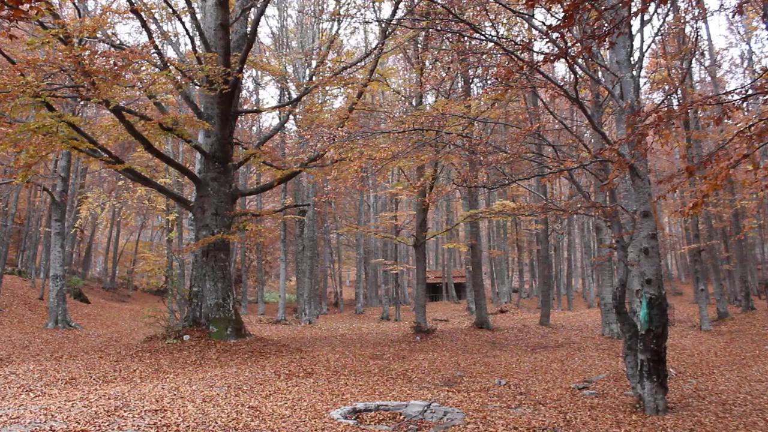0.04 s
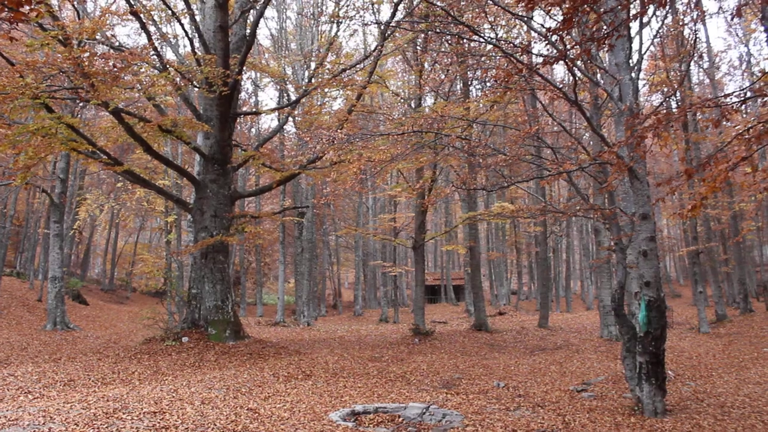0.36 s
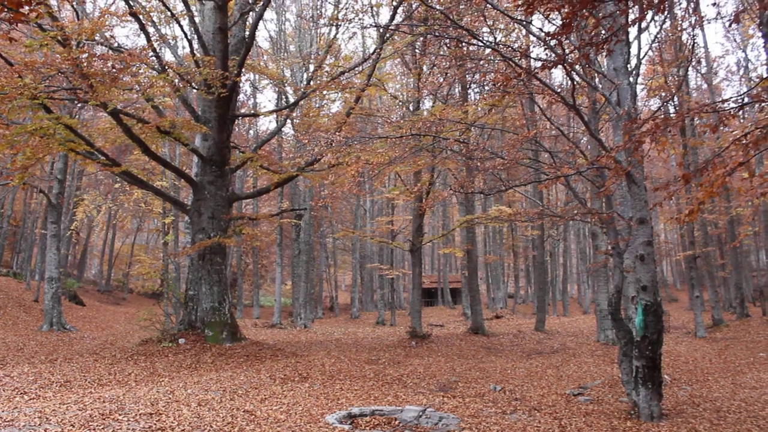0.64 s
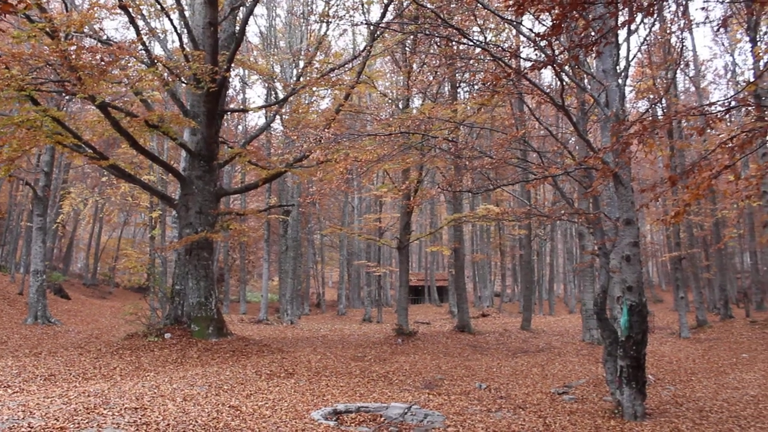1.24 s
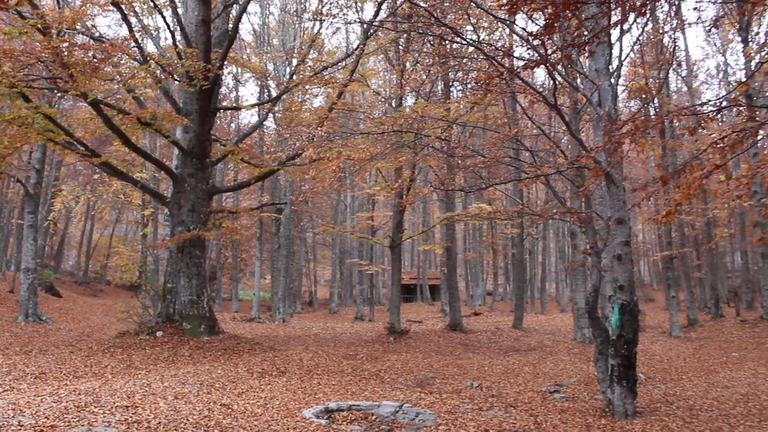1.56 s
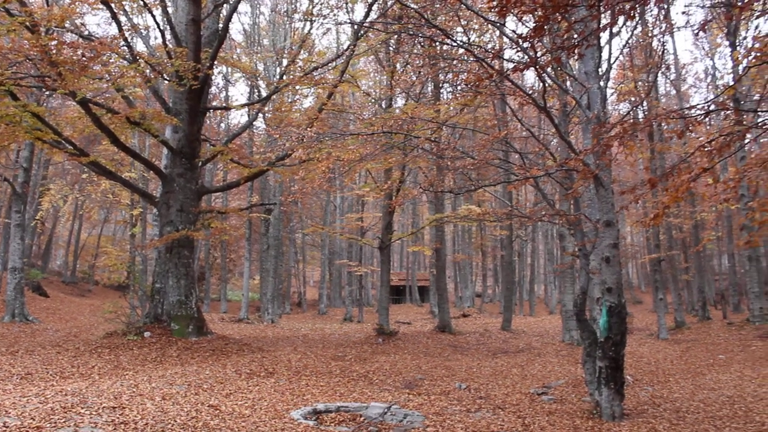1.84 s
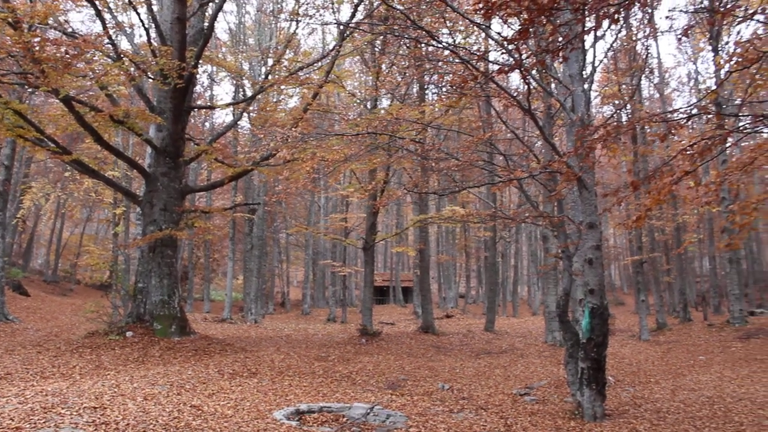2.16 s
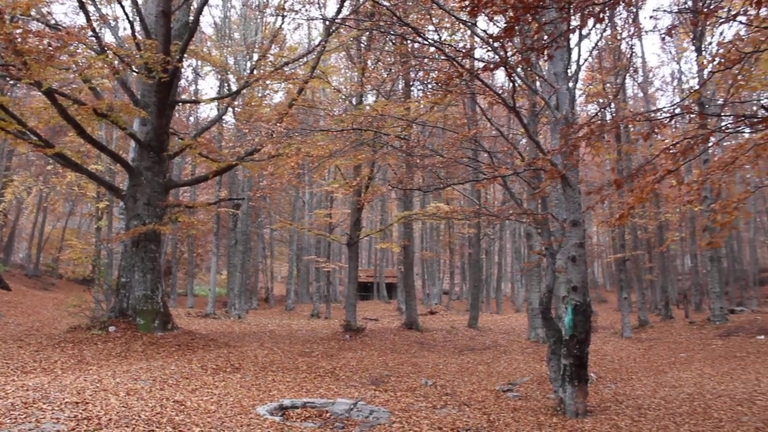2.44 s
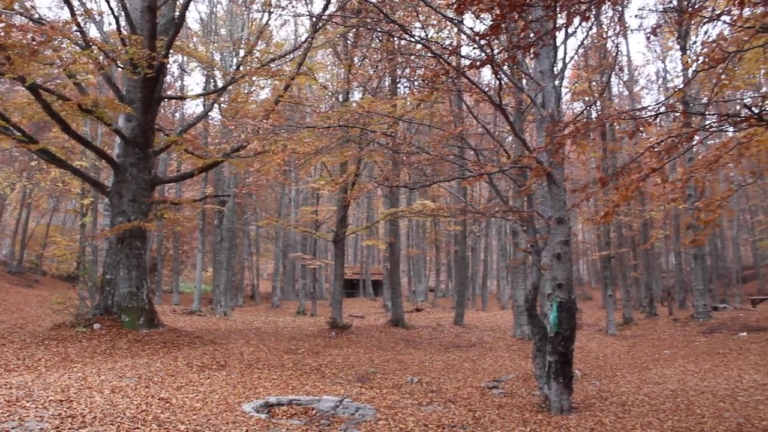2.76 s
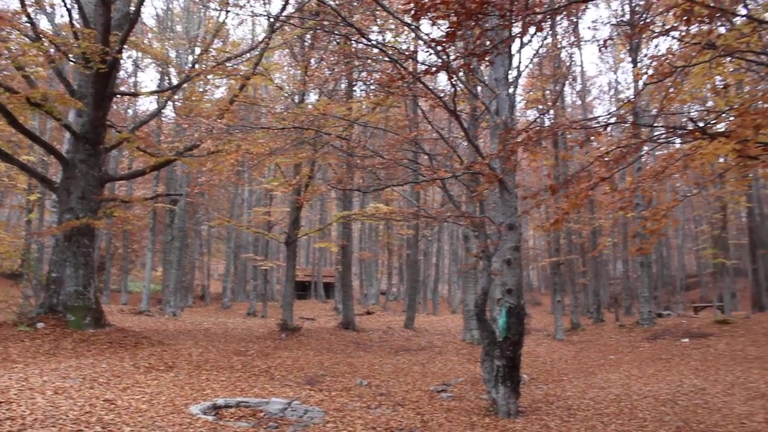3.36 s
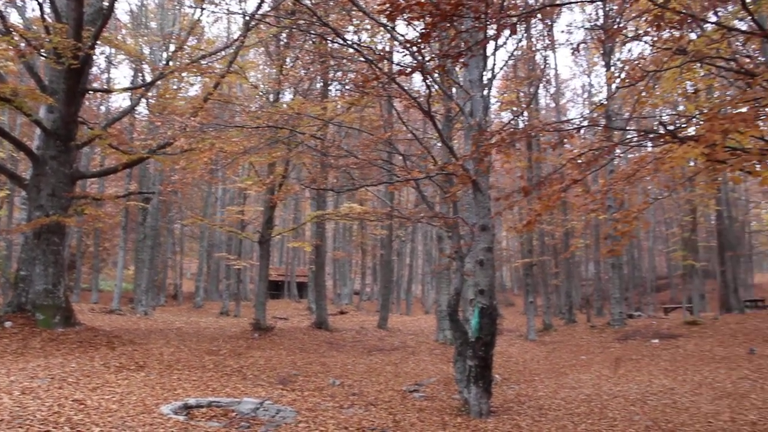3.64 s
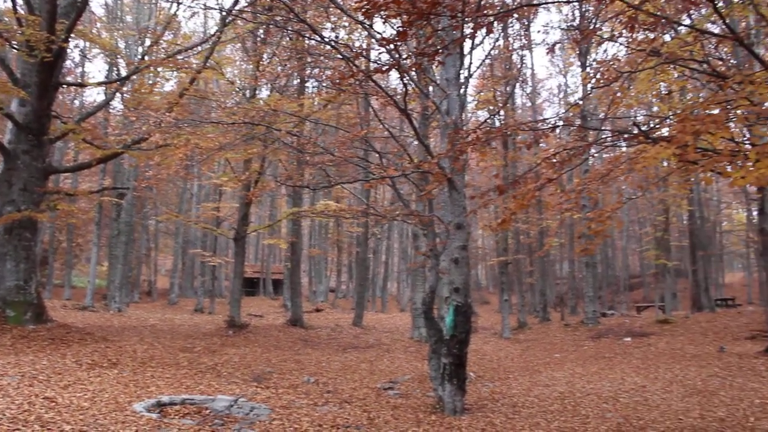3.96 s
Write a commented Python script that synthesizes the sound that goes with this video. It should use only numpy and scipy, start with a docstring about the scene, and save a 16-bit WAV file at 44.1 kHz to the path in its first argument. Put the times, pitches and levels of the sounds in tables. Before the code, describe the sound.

Dry leaves rustle in a steady forest wind for the whole four seconds, a bright hiss over the soft rush of distant treetops, swelling slightly around 0.4 and 3.2 seconds. Falling leaves land close by with irregular crisp ticks, several a second, and occasional duller pats. The sharpest ticks come near 0.4 and 2.8 seconds, the rustle dipping briefly after each, and the clearest pat near 3.6 seconds.

```python
"""Wind in an autumn forest

Thousands of dry leaves tap each other in a steady wind, over the soft rush of distant crowns.
Brittle edges snap, and falling leaves land close by with sharp ticks and duller pats.
The mono recorder's gain control ducks after each loud tick and creeps back up."""
import sys
import numpy as np
from scipy import signal
from scipy.fft import rfft, irfft
from scipy.io import wavfile
from scipy.ndimage import map_coordinates

SR = 44100
rng = np.random.default_rng(int(sys.argv[2]) if len(sys.argv) > 2 else 0)


def materialize(psi):
    """Save the field psi as 16-bit PCM at rate SR to the path in sys.argv[1].

    A 1-D psi becomes a single channel; in a 2-D psi each row is a channel.
    """
    bounded = np.clip(np.atleast_2d(psi).T, -1, 1)
    quanta = np.round(bounded * 32767).astype(np.int16)
    wavfile.write(sys.argv[1], SR, quanta)


N = 176400
LEAF_Q = 1.18  # a dry leaf barely rings


def undb(db):
    """Decibels to gain."""
    return 10 ** (np.asarray(db) / 20)


def level(x, db):
    """Set the rms level."""
    return x * undb(db) / np.sqrt(np.mean(x ** 2))


def colour(x, points):
    """Equalise a sound along a curve of (f/Hz, level/dB) points."""
    hz, db = np.array(points).T
    f = np.maximum(np.arange(N // 2 + 1) * SR / N, 1)
    return irfft(rfft(x) * undb(np.interp(np.log(f), np.log(hz), db)), N)


def walk(steps_per_s):
    """Smooth random motion with a spread of one."""
    steps = rng.standard_normal(400)
    y = map_coordinates(steps, [np.arange(N) / SR * steps_per_s], order=3, mode="mirror")
    return (y - y.mean()) / y.std()


def resonate(x, hz, q):
    """A band-pass resonance with gain one at its centre."""
    w = 2 * np.pi * hz / SR
    a = np.sin(w) / (2 * q)
    return signal.lfilter([a, 0, -a], [1 + a, -2 * np.cos(w), 1 - a], x)


def rustle(flutter_db=0.86, flutter_per_s=14, spread_db=4):
    """Countless leaf touches, each a click ringing for a cycle or two; bright ones come most often."""
    # EQ of the rustle: f/Hz, level/dB
    rustle_eq = [(12, -67), (20, -32.5), (54, -27), (391, -13.5), (6840, 0), (8080, -2), (15300, -43)]
    out, shared_flutter = np.zeros(N), walk(flutter_per_s)
    for hz in np.geomspace(120, 13000, 15):
        touches_per_s = 760 * (hz / 1000) ** .6
        touch = rng.random(N) < touches_per_s / SR
        size = undb(spread_db * np.minimum(rng.exponential(size=N), 3.36))
        clicks = level(touch * size * rng.choice([-1, 1], N), 0)
        flutter = undb(flutter_db * (0.2 * shared_flutter + walk(flutter_per_s)))
        out += resonate(clicks, hz, LEAF_Q) * flutter
    return level(colour(out, rustle_eq), -19.5)


def crackles(snaps_per_s=14, hz=8800, q=1.5):
    """Brittle leaf edges give tiny bright snaps at random moments."""
    snap = rng.random(N) < snaps_per_s / SR
    size = undb(-18 - 3 * rng.standard_normal(N))
    return resonate(resonate(snap * size, hz, q), hz, q)


def crowns(sway_db=0.24):
    """Distant foliage blurs into a smooth, gently swaying rush."""
    # spectrum of the distant crowns: f/Hz, level/dB
    crown_eq = [(18, -68), (30, -38.5), (364, -10), (612, -11), (2920, -2), (6700, 0), (8040, -4),
                (15000, -40.5)]
    rush = level(colour(rng.standard_normal(N), crown_eq), -21.5)
    return rush * undb(-sway_db * walk(6))


def landings(hits, decay_cycles, q, attack_cycles=0.25, settle_s=0.0023):
    """Each landing is a heavily damped ring with a faint crinkle as the leaf settles."""
    out, t = np.zeros(N + SR), np.arange(SR // 25) / SR
    soften = signal.butter(3, [256, 9500], "bandpass", fs=SR, output="sos")
    for start, peak_db, hz in hits:
        cycles = t * hz
        attack = 1 - np.exp(-(cycles / attack_cycles) ** 2)
        decay = np.exp(-cycles / decay_cycles)
        ring = resonate(np.sin(2 * np.pi * cycles) * attack * decay, hz, q)
        leaf_noise = resonate(rng.standard_normal(len(t)), hz, LEAF_Q)
        crinkle = level(leaf_noise, -28) * np.exp(-t / settle_s)
        hit = signal.sosfilt(soften, ring / np.abs(ring).max() + crinkle)
        i = int(start * SR)
        out[i:i + len(t)] += undb(peak_db) * hit / np.abs(hit).max()
    return out[:N]


def ticks():
    """Dry leaves land nearby with a crisp, high tick."""
    # onset, peak and ring of each tick: t/s, level/dB, f/Hz
    tick_hits = [(.183, -3, 5000), (.4274, -7, 5800), (.4352, 4, 4020), (.578, -2, 4970), (.8803, -6, 5200),
                 (.8968, 0.5, 3300), (1.02, -7, 6000), (1.042, -0.5, 5550), (1.094, -6, 6400),
                 (1.35, -3, 4370), (1.371, -6.5, 5600), (1.493, -4, 3930), (1.869, -4, 3870),
                 (1.942, -3.5, 6000), (2.05, -4.5, 3820), (2.182, -6, 3400), (2.257, -3, 5200),
                 (2.3018, 2, 5300), (2.61, -1.5, 6600), (2.7931, 6.5, 6670), (2.863, 1, 6000),
                 (3.299, -2.5, 5560), (3.4895, 0, 5550), (3.73, -3.5, 5500), (3.843, -14, 4930)]
    return landings(tick_hits, decay_cycles=.9, q=0.83)


def pats():
    """Leaves drop on the leaf litter with a dull pat that dies in about a cycle."""
    # onset, peak and ring of each pat: t/s, level/dB, f/Hz
    pat_hits = [(1.0053, -8.5, 1050), (1.345, -20, 900), (1.8125, -19.5, 750), (2.1975, -18, 625),
                (2.5635, -7.5, 1410), (2.77, -25, 700), (3.1128, -13, 1410), (3.5878, -1.2, 2000),
                (3.96, -21, 606)]
    return landings(pat_hits, decay_cycles=0.35, q=0.18)


def scene():
    """The foliage bed rides the wind; leaves land around the microphone."""
    # strength of the wind: t/s, level/dB
    wind_curve = [(0, -1), (.38, 1.7), (.6, 0.9), (.85, 1.1), (1.12, 0.3), (1.25, 0), (1.75, -0.5),
                  (2.0, -1.4), (2.2, -0.5), (2.42, -0.5), (2.75, 0.3), (2.98, -0.2), (3.18, 1), (3.66, 0.2),
                  (4.0, -1.2)]
    wind = undb(np.interp(np.arange(N) / SR, *np.array(wind_curve).T))
    foliage = rustle() + crackles() + crowns()
    mono = wind * foliage + ticks() + pats()
    return np.array([mono, mono])


def record(dry, threshold_db=-6, max_duck_db=7.5, attack_s=0.014, release_db_per_s=13.5):
    """Gain control dips on peaks and recovers steadily; the loudest ticks clip and the top is cut."""
    t = np.arange(N) / SR - .072  # the sound opens after a moment of silence
    x = dry * (t >= 0)
    over_db = np.maximum(20 * np.log10(np.abs(x[0]) + 1e-9) - threshold_db, 0)
    target_db = np.where(t < 0, 6, np.minimum(0.84 * over_db, max_duck_db))  # starts ducked
    recovery_db = release_db_per_s * t
    held_db = np.maximum.accumulate(target_db + recovery_db) - recovery_db
    pole = np.exp(-1 / (attack_s * SR))
    duck_db = signal.lfilter([1 - pole], [1, -pole], held_db)
    clipped = np.clip(x * undb(-duck_db), -.93, .93)
    high_cut = signal.ellip(8, .2, 70, 15300, fs=SR, output="sos")
    return signal.sosfilt(high_cut, clipped)


dry = scene()
out = record(dry)
materialize(out)
```